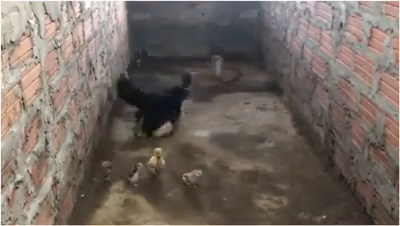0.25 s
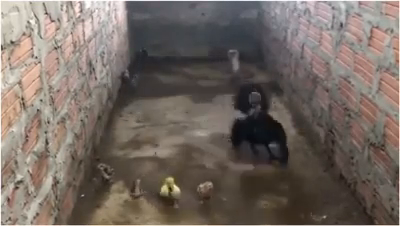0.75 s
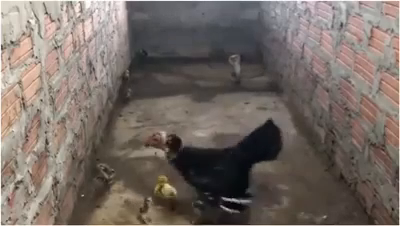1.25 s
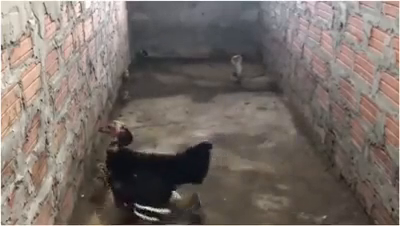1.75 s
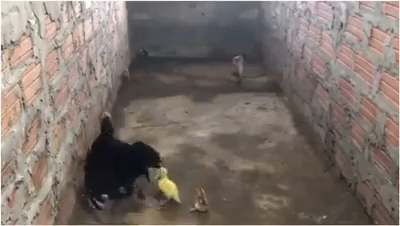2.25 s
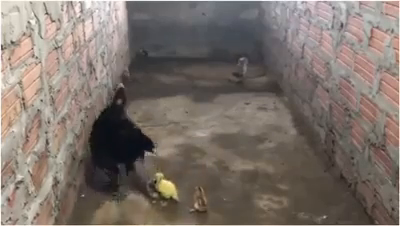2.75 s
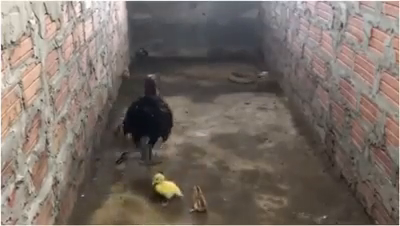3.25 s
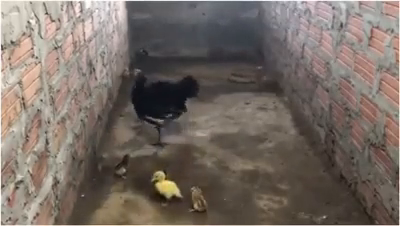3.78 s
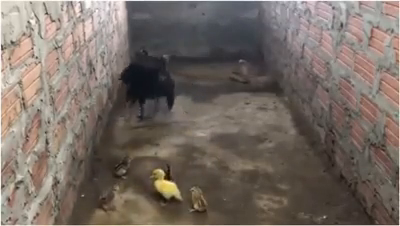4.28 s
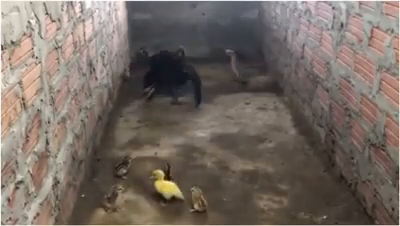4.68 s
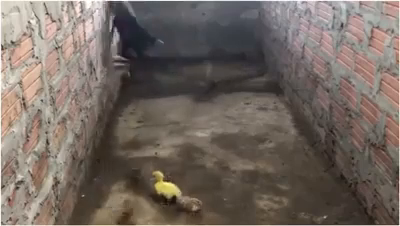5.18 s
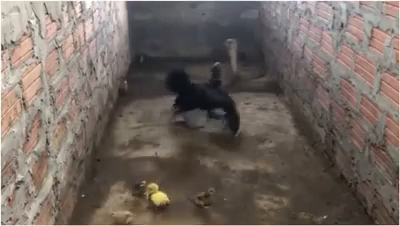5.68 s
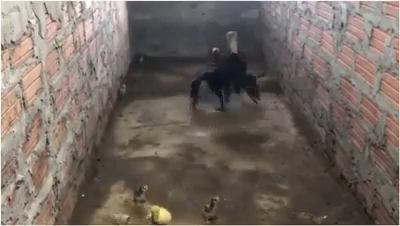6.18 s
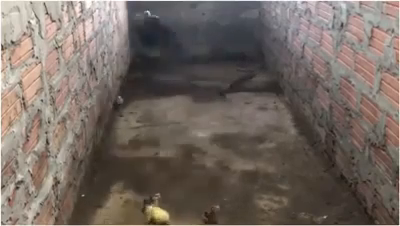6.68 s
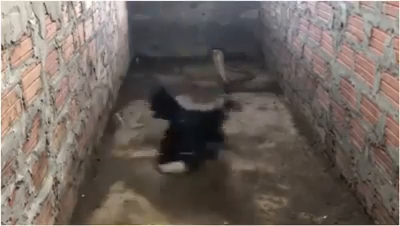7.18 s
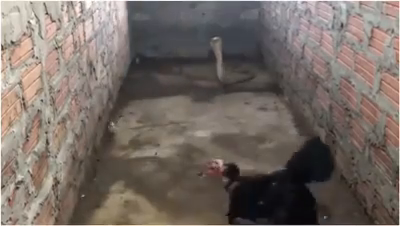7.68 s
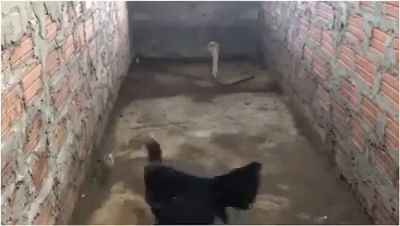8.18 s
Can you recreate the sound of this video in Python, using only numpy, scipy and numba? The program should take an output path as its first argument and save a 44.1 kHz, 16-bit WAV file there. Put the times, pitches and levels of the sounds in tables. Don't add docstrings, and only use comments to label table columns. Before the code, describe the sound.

Chicks whistle falling peeps as a hen gives rough clucks, long squawks and two shrill flapping outbursts between hard echoing walls.

```python
import sys
import numpy as np
from scipy import signal
from scipy.fft import rfft, irfft, next_fast_len
from scipy.io import wavfile
from scipy.ndimage import uniform_filter1d
from numba import njit

SR = 44100
rng = np.random.default_rng(int(sys.argv[2]) if len(sys.argv) > 2 else 0)


def store_pcm(level_fs):
    pcm = np.round(np.clip(level_fs, -1, 1) * 32767).astype(np.int16)
    wavfile.write(sys.argv[1], SR, np.atleast_2d(pcm).T)


def gain_from_db(level_db):
    decades = np.asarray(level_db, float) / 20
    return 10 ** decades


N = 371763


def level(x, db):
    return x * gain_from_db(db) / np.sqrt(np.mean(x ** 2))


def colour(x, points):
    size = next_fast_len(len(x))
    hz, db = np.transpose(points)
    axis_hz = np.fft.rfftfreq(size, 1 / SR) + 1
    gain = gain_from_db(np.interp(np.log(axis_hz), np.log(hz), db))
    return irfft(rfft(x, size) * gain, size)[:len(x)]


@njit
def sweep(x, hz, width):
    y, b, l = np.empty(len(x)), 0., 0.
    for i in range(len(x)):
        g, k = np.tan(np.pi * hz[i] / SR), width / hz[i]
        v = (b + g * (x[i] - l)) / (1 + g * (g + k))
        b, l, y[i] = 2 * v - b, l + 2 * g * v, k * v
    return y


def band(x, hz, width):
    hz = hz + np.zeros(len(x))
    once = sweep(x, hz, 1. * width)
    return sweep(once, hz, 1. * width)


def read(table, span_s, edge_s=.009):
    s, *columns = np.transpose(table)
    t = s[0] + np.arange(int(span_s * SR)) / SR
    edges = np.clip(np.minimum(t - s[0], s[-1] - t) / edge_s, 0, 1)
    return int(s[0] * SR), edges, [np.interp(t, s, c) for c in columns]


def add(out, start, x):
    out[start:start + len(x)] += x[:len(out) - start]


# frequency in Hz, level in dB per Hz.
AIR_COLOUR = [(35, -27), (60, 0), (250, -10.5), (700, -15.5), (2000, -21.5), (5000, -17.5), (10000, -31),
              (15000, -45.5)]
# frequency in Hz, width in Hz, level in dB.
HUM_LINES = [(89, 9.5, -57.5), (130.9, 12, -59.5), (236, 175, -58)]


def background():
    out = level(colour(rng.standard_normal(N), AIR_COLOUR), -53.5)
    out = out + gain_from_db(-55.5) * np.sqrt(2) * np.sin(2 * np.pi * 246.4 * np.arange(N) / SR)
    for hz, width_hz, db in HUM_LINES:
        out = out + level(band(rng.standard_normal(N), hz, width_hz), db)
    knots = np.linspace(0, N, 24)
    drift, sway = (np.interp(np.arange(N), knots, row) for row in rng.uniform(-1.5, 1.5, (2, 24)))
    drone_hz = 44.5 * (1 + .025 * drift)
    drone = np.sin(2 * np.pi * np.cumsum(drone_hz) / SR)
    return out + np.sqrt(2) * gain_from_db(-54.5 + 2.5 * sway) * drone


EFFORT_BRIGHTENS = 0.18


def call(hz, db, low_db, throat_hz, throat_db, treble_db, rough, throat, multiple, share):
    rough = np.clip(rough, 0, 1)
    cycle = (np.cumsum(hz) / SR).astype(int)
    chance = np.clip(rng.standard_normal((400, 2)), -1.7, 1.7)[cycle].T
    phase = 2 * np.pi * np.cumsum(hz * (1 + .22 * rough * chance[0])) / SR
    order = np.arange(1, 27)[:, None]
    steps = np.repeat(rng.standard_normal((26, len(hz) // 900 + 1)), 900, axis=1)
    sway = uniform_filter1d(steps, 900, axis=1)[:, :len(hz)]
    harmonics = gain_from_db(2.5 * sway) * np.cos(order * phase + .06 * order ** 2)
    pulses = harmonics.sum(axis=0) / np.sqrt(13)
    puffs = rng.standard_normal(len(hz)) * (.8 + .5 * np.cos(phase))
    voiced = pulses * gain_from_db(8 * rough * chance[1])
    source = (1 - .5 * rough) * voiced + (.012 + .9 * rough) * puffs
    beak = level(band(source, multiple * hz, share * multiple * hz.mean()), 0)
    windpipe = level(band(source, 630, 890), low_db)
    edge = (1 - rough) * voiced + (.14 + .9 * rough) * puffs
    treble = level(colour(edge, throat), 0) + level(band(source, throat_hz, 490), throat_db)
    treble_gain = gain_from_db(treble_db + EFFORT_BRIGHTENS * (db - db.max()))
    return gain_from_db(db) * (beak + windpipe + treble_gain * treble)


# frequency in Hz, level in dB per Hz.
SHORT_CALL_THROAT = [(1500, -10), (2100, 3.5), (3200, 5.5), (4500, 0.5), (6000, -3), (9000, -6.5),
                     (12000, -23), (15500, -25.5)]


def clucks(rows, mouths, onset_db, end_db, onset_pitch, end_pitch, rough, end_rough,
           windpipe_db, beak_share, throat_db):
    out = np.zeros(N)
    scoop_s, scoop_pitch, scoop_db = .009, .65, -18
    for (s, rise, fall, hz, db), (beak_hz, throat_hz, treble_db) in zip(rows, mouths):
        curve = [(max(s - scoop_s, 0), scoop_pitch * hz, db + onset_db + scoop_db, rough),
                 (s, onset_pitch * hz, db + onset_db, rough),
                 (s + rise, hz, db, rough),
                 (s + rise + fall, end_pitch * hz, db + end_db, end_rough)]
        start, edges, (second_hz, swell_db, harsh) = read(curve, .12)
        voice = call(second_hz / 2, swell_db, windpipe_db, throat_hz * second_hz / hz, throat_db,
                     treble_db, harsh, SHORT_CALL_THROAT, 2 * beak_hz / hz, beak_share)
        add(out, start, edges * voice)
    return out


# start in seconds, rise in seconds, fall in seconds, second harmonic in Hz, peak in dB.
ALARM_TIMES = [(0.0, 0.00075, 0.056, 1180, -17.5), (.065, .03, 0.042, 1165, -8.5),
               (.235, 0.027, 0.038, 1139, -11), (.45, 0.0265, 0.033, 1238, -9.5),
               (4.705, 0.034, 0.044, 1092, -12), (5.405, 0.023, 0.039, 1151, -12),
               (5.665, 0.036, 0.051, 1083, -16), (5.855, .03, .035, 1341, -10),
               (6.252, 0.022, .06, 1186, -12.5), (7.043, 0.012, 0.048, 1291, -10.5),
               (7.443, 0.0068, 0.019, 1139, -21)]
# beak resonance in Hz, throat resonance in Hz, treble in dB.
ALARM_MOUTH = [(1160, 3800, -7.5), (1180, 3600, -4.5), (1167, 3000, -3), (1317.7, 1900, -4.5),
               (1057, 3480, -6.5), (1140, 3100, -3.5), (990, 1930, -4.5), (1366, 860, -6),
               (1240, 3700, -3.5), (1280, 2700, -2.5), (1040, 3900, -6)]


def alarm_clucks():
    return clucks(ALARM_TIMES, ALARM_MOUTH, onset_db=-13, end_db=-9.5, onset_pitch=.92, end_pitch=.86,
                  rough=.35, end_rough=.45, windpipe_db=-15.5, beak_share=.83, throat_db=-7.5)


PEEP_DIVE = [(0, 0), (.3, .07), (.45, .25), (.6, .52), (.85, .71), (1, 1), (1.3, 1.25)]


def chick(peeps, end_hz):
    out, t = np.zeros(N), np.arange(0, .22, 1 / SR)
    hook_share, hook_power = .11, 2.7
    for start, hold, fall, top_hz, db in peeps:
        dive = np.clip((t - hold) / fall, 0, 1.3)
        hook = np.clip(1 - t / hold, 0, 1)
        curve = uniform_filter1d(np.interp(dive, *np.transpose(PEEP_DIVE)), size=300)
        hz = top_hz - (top_hz - end_hz) * curve - hook_share * top_hz * hook ** hook_power
        wobble = uniform_filter1d(rng.standard_normal((2, len(t))), size=60, axis=1) * np.sqrt(60)
        flutter = uniform_filter1d(rng.standard_normal(len(t)), size=400) * 20
        phase = 2 * np.pi * np.cumsum(hz * (1 + .012 * wobble[0])) / SR
        shape_db = np.interp(dive, [0, .25, .6, .95, 1.2], [-1, -1.5, 9, 7.5, -32.5])
        shape_db = shape_db - 8 * hook + 0.47 * wobble[1] + 3 * flutter
        overtones = gain_from_db(-31) * np.sin(2 * phase) + gain_from_db(-44.5) * np.sin(3 * phase)
        tone = np.sin(phase) + gain_from_db(shape_db) * overtones
        fades = np.clip(np.minimum(t, hold + 1.162 * fall - t) * 200, 0, 1)
        add(out, int(start * SR), gain_from_db(db + shape_db) * fades * tone)
    return out


# start in seconds, rise and hold in seconds, fall in seconds, top note in Hz, level in dB.
MIDDLE_CHICK = [(.555, .008, .115, 5500, -38.5), (1.0, .012, .068, 5500, -43),
                (1.456, .04, .078, 5470, -36.5), (1.755, .01, .072, 5565, -35.5),
                (2.09, 0.044, 0.043, 5430, -44), (2.415, .015, 0.041, 4970, -49),
                (2.742, 0.0099, 0.037, 4970, -38), (2.89, .01, 0.024, 5380, -51),
                (2.99, 0.04, 0.03, 5500, -50), (3.108, 0.02, 0.035, 5300, -37),
                (3.905, 0.027, 0.036, 5050, -41), (4.278, 0.042, .03, 5050, -42),
                (4.595, 0.024, 0.034, 5100, -46.5), (5.59, 0.011, 0.038, 5140, -41),
                (6.018, .012, .055, 5580, -38.5), (7.855, .01, 0.027, 5345, -37),
                (7.89, 0.0086, 0.045, 5000, -40.5), (8.09, 0.036, 0.04, 5340, -36),
                (8.146, 0.027, .055, 5700, -38), (8.295, .006, .062, 5210, -34)]
LOW_CHICK = [(.76, .005, .07, 5070, -41.5), (.955, .008, .085, 4940, -38.5),
             (1.06, 0.0093, .08, 4740, -46.5), (1.288, 0.022, 0.051, 5154, -36),
             (1.4, 0.0067, 0.064, 4020, -46.5), (1.65, 0.013, 0.075, 4660, -39.5),
             (1.92, 0.029, 0.065, 4840, -36), (2.14, 0.0067, 0.049, 4070, -52),
             (2.22, 0.02, 0.085, 4870, -36.5), (2.572, 0.034, 0.095, 4730, -38.5),
             (2.955, .03, .092, 4745, -38), (3.283, .025, .1, 4810, -35), (3.85, 0.022, 0.061, 4700, -36.5),
             (4.002, 0.0061, 0.065, 3860, -54.5), (4.5, 0.018, 0.071, 4540, -49.5),
             (5.765, 0.011, .075, 4680, -34.5), (6.12, .008, 0.064, 4690, -37.5),
             (6.35, 0.0033, 0.051, 5080, -36), (6.414, .025, 0.066, 4740, -39.5),
             (7.1, 0.007, 0.041, 4440, -39), (7.235, .008, 0.059, 5050, -36),
             (7.375, .065, 0.083, 4720, -36.5), (7.5, 0.012, .08, 4400, -50),
             (8.012, .006, 0.085, 3980, -37.5), (8.07, 0.0062, .065, 4300, -41),
             (8.21, 0.0086, .1, 4100, -46), (3.42, .036, 0.039, 5830, -40)]
HIGH_CHICK = [(.805, 0.01, .085, 5830, -33), (1.148, 0.015, .095, 5795, -39.5),
              (1.47, 0.028, 0.13, 6200, -46), (1.79, 0.029, 0.093, 5807, -39.5),
              (2.12, 0.029, .105, 5800, -38.5), (2.418, 0.023, 0.093, 5820, -37),
              (2.73, 0.023, 0.095, 5950, -38), (3.08, 0.024, 0.092, 5990, -39), (3.745, .01, .1, 6080, -34),
              (4.032, 0.029, .115, 5785, -33), (4.36, 0.041, .105, 6090, -29.5),
              (4.69, 0.066, 0.087, 6380, -32), (5.32, .015, .065, 5620, -35.5),
              (5.783, 0.042, .06, 5610, -30), (6.135, 0.011, .085, 5670, -36.5),
              (6.405, 0.02, .085, 5860, -35.5), (7.99, 0.028, 0.11, 5540, -37.5),
              (8.353, 0.039, 0.088, 5550, -34)]
# delay in seconds, level in dB.
NEAR_ECHOES = [(.007, -12), (.016, -12), (.029, -13)]


def chicks():
    peeps = chick(MIDDLE_CHICK, end_hz=2810) + chick(LOW_CHICK, end_hz=2380) + chick(HIGH_CHICK, end_hz=2800)
    return peeps, sum(gain_from_db(db) * np.roll(peeps, int(s * SR)) for s, db in NEAR_ECHOES)


# start in seconds, rise in seconds, fall in seconds, second harmonic in Hz, peak in dB.
CLEAR_TIMES = [
    (.685, .045, .03, 1040, -15),
    (6.495, 0.053, 0.027, 1241, -12),
    (7.37, 0.029, 0.045, 967, -17.5),
    (7.588, 0.023, 0.042, 905, -17),
]
# beak resonance in Hz, throat resonance in Hz, treble in dB.
CLEAR_MOUTH = [(1115, 2900, -6), (1500, 2450, -2), (1040, 3200, -4.5), (1250, 4300, -5.5)]


def clear_clucks():
    return clucks(CLEAR_TIMES, CLEAR_MOUTH, onset_db=-12, end_db=-14.5, onset_pitch=.86, end_pitch=.95,
                  rough=.22, end_rough=.55, windpipe_db=-11, beak_share=.88, throat_db=-11)


# start in seconds, rise in seconds, fall in seconds, second harmonic in Hz, peak in dB.
SOFT_TIMES = [
    (1.295, 0.0085, 0.04, 800, -46.5),
    (1.338, 0.0086, 0.042, 960, -31),
    (1.96, 0.0052, 0.011, 855, -60),
    (1.987, 0.0089, 0.046, 981, -26),
    (2.66, .008, 0.032, 960, -28.5),
    (3.38, 0.028, 0.012, 987, -35),
]
# beak resonance in Hz, throat resonance in Hz, treble in dB.
SOFT_MOUTH = [(690, 4500, -14), (770, 4550, -3.5), (750, 4500, -17), (870, 4300, -10), (800, 4500, -14.5),
              (900, 4500, -12)]


def soft_clucks():
    return clucks(SOFT_TIMES, SOFT_MOUTH, onset_db=-20, end_db=-15.5, onset_pitch=.95, end_pitch=.88,
                  rough=.55, end_rough=.7, windpipe_db=-2, beak_share=1.1, throat_db=1.5)


# start in seconds, rise in seconds, fall in seconds, peak in dB.
RUSTLE_TIMES = [
    (1.78, 0.077, 0.036, -38),
    (4.94, .05, .05, -35),
    (5.05, 0.043, .06, -28.5),
    (5.17, 0.044, 0.074, -39.5),
    (6.56, 0.044, 0.033, -31),
    (6.68, 0.022, 0.051, -30),
    (6.8, 0.0296, 0.057, -31.5),
    (6.995, 0.0073, 0.055, -36.5),
    (7.31, 0.0255, 0.0605, -36),
]


def rustles():
    out = np.zeros(N)
    depth_db = -21
    for s, rise, fall, db in RUSTLE_TIMES:
        brush = [(s, db + depth_db), (s + rise, db), (s + rise + fall, db + depth_db)]
        start, edges, (brush_db,) = read(brush, .2, .01)
        noise = rng.standard_normal(len(edges))
        hiss = colour(noise, [(1000, 2.0), (3000, 10.5), (9000, 3.5), (15000, -15.5)])
        add(out, start, edges * gain_from_db(brush_db) * level(hiss, 2.8))
    return out


# start in seconds, length in seconds, pitch in Hz, level in dB.
DISTANT_NOTES = [
    (2.808, .13, 1910, -55),
    (3.172, .21, 1000, -55.5),
    (3.2, .06, 1558, -59),
]


def far_hen():
    out = np.zeros(N)
    for start, length, hz, db in DISTANT_NOTES:
        t = np.arange(0, length, 1 / SR)
        swell = np.sin(np.pi * t / length)
        add(out, int(start * SR), gain_from_db(db) * swell * np.sin(2 * np.pi * hz * t))
    return out


# time in seconds, pitch in Hz, level in dB, treble in dB, roughness 0-1.
LONG_SQUAWKS = [
    [(3.452, 587, -9.5, 0, 0.01), (3.46, 559.2, -11.5, -8, 0.1), (3.492, 564.3, -9.5, -4.5, 0.03),
     (3.528, 534, -23.5, 4, 0.06), (3.552, 536, -17, -0.5, 0), (3.62, 572.3, -11.5, -6.5, 0.02),
     (3.694, 586.2, -9, -7, 0.03), (3.705, 603, -22.5, -6.5, 0.1)],
    [(7.67, 511, -13, 3, 0.02), (7.674, 507.6, -10.5, -3, 0.02), (7.69, 561, -9, -4, 0.1),
     (7.714, 560.2, -12.5, 4.5, 0.04), (7.746, 568, -11, -2, 0.01), (7.762, 594.3, -9.5, -0.5, 0.03),
     (7.786, 590, -15.5, 3, 0.1), (7.798, 551, -11, -5, 0.04), (7.812, 563, -17, -7, 0)],
]
# start in seconds, length in seconds, level in dB.
VOICE_BREAKS = [
    (3.704, .05, -15),
    (7.803, .05, -19),
]
LONG_CALL_THROAT_HZ = [2040, 3300, 2930, 3500]
# frequency in Hz, level in dB per Hz.
LONG_CALL_THROAT = [(1400, -18.5), (2200, 4), (2900, -9), (3400, -4), (5200, -10), (9000, -15),
                    (12000, -33.5), (15500, -35)]


def squawks():
    out = np.zeros(N)
    break_hz, sag, fade_db = 573.4, .78, -8
    treble, dulls_db, roughness = 2, -19, .85
    breaks = [[(s, break_hz, db, treble, roughness),
               (s + length, sag * break_hz, db + fade_db, treble + dulls_db, roughness)]
              for s, length, db in VOICE_BREAKS]
    for table, throat_hz in zip(list(LONG_SQUAWKS) + breaks, LONG_CALL_THROAT_HZ):
        start, edges, (hz, db, treble_db, rough) = read(table, .28)
        voice = call(hz, db, -16.5, throat_hz, -7.0, treble_db, rough, LONG_CALL_THROAT,
                     multiple=2.23, share=.61)
        add(out, start, edges * voice)
    return out


# start in seconds, rise in seconds, fall in seconds, second harmonic in Hz, peak in dB.
MUTTER_TIMES = [
    (4.293, 0.036, 0.022, 830, -24.5),
    (4.52, 0.03, 0.023, 855, -18.5),
    (6.07, 0.039, 0.037, 962, -14),
    (8.365, 0.029, 0.067, 830, -27),
]
# beak resonance in Hz, throat resonance in Hz, treble in dB.
MUTTER_MOUTH = [(746, 1680, -15.5), (850, 4500, -17), (960, 3340, -9.5), (728, 5100, -16)]


def mutters():
    return clucks(MUTTER_TIMES, MUTTER_MOUTH, onset_db=-10.5, end_db=-5.5, onset_pitch=.88, end_pitch=1.0,
                  rough=.38, end_rough=.35, windpipe_db=-23, beak_share=.54, throat_db=-3)


# start in seconds, rise in seconds, fall in seconds, second harmonic in Hz, peak in dB.
CACKLE_TIMES = [
    (4.875, .036, .03, 1250, -7.5),
    (4.995, .028, 0.0453, 1466, -5.5),
    (5.108, .014, 0.054, 1476, -6),
    (5.243, 0.011, .038, 1280, -6),
    (6.6, .047, 0.055, 1307, -6),
    (6.73, .03, .012, 1500, -3),
    (6.778, .02, 0.019, 1176, -8),
    (6.855, .024, .035, 1322, -8),
]
# beak resonance in Hz, throat resonance in Hz, treble in dB.
CACKLE_MOUTH = [(1420, 3940, -7), (1540, 3900, -7), (1500, 3720, -8.5), (1350, 4030, -7),
                (1760, 2900, -6.5), (1500, 4400, -7.5), (1250, 4400, -9), (1376, 3680, -5)]


def flight_cackles():
    return clucks(CACKLE_TIMES, CACKLE_MOUTH, onset_db=-9.5, end_db=-9, onset_pitch=.93, end_pitch=.74,
                  rough=.36, end_rough=.5, windpipe_db=-23, beak_share=.54, throat_db=-9.5)


# peak time in seconds, level in dB.
BEAT_TIMES = [
    (4.961, -40),
    (5.08, -32),
    (5.125, -36),
    (5.208, -36.5),
    (6.596, -37),
    (6.652, -36),
    (6.8, -34),
    (6.891, -38),
]


def wing_beats():
    out = np.zeros(N)
    rise_s, fall_s, depth_db = .079, .13, -26.5
    for s, db in BEAT_TIMES:
        beat = [(s - rise_s, db + depth_db), (s, db), (s + fall_s, db + depth_db)]
        start, edges, (push_db,) = read(beat, .16, .02)
        air = rng.standard_normal((2, len(edges)))
        thump = level(band(band(air[0], 92, 83), 80, 53), 0)
        rush = level(band(air[1], 140, 158.6), -4.5)
        add(out, start, edges * gain_from_db(push_db) * (thump + rush))
    return out


# frequency in Hz, decay by 60 dB in seconds, level in dB.
WALL_RING = [(266, 0.2, -13), (625, 0.39, -17), (830, 0.54, -25), (1250, 0.38, -19.5), (2610, 0.61, -25),
             (3580, 0.34, -20.5), (5500, 0.74, -26), (9740, 0.25, -12.5)]
STANDING_WAVES = [(555, .3, -33), (905, .4, -28)]
# delay in seconds, level in dB.
FIRST_ECHOES = [(.0031, -17.5), (.0074, -19), (0.0114, -16), (0.023, -27.5), (0.036, -21.5), (0.058, -28.5)]


def corridor(x):
    t = np.arange(SR) / SR
    tail = 0
    for hz, t60, db in WALL_RING:
        noise = level(band(rng.standard_normal(SR), hz, .8 * hz), db)
        tail = tail + noise * gain_from_db(-60 * t / t60) / np.sqrt(t60 * SR / 14)
    for hz, t60, db in STANDING_WAVES:
        tail = tail + gain_from_db(db - 60 * t / t60) * np.sin(2 * np.pi * hz * t) / np.sqrt(t60 * SR / 28)
    tail = tail * np.clip(t / 0.0004 - 1, 0, 1)
    for s, db in FIRST_ECHOES:
        tail[int(s * SR)] += gain_from_db(db)
    return x + signal.fftconvolve(x, tail)[:N]


def scene():
    peeps, doubles = chicks()
    hen = alarm_clucks() + clear_clucks() + soft_clucks() + squawks() + mutters() + flight_cackles()
    feathers = rustles() + wing_beats()
    birds = corridor(hen + far_hen() + peeps + doubles + feathers)
    return (birds - .5 * peeps + background())[None]


def band_limit(x):
    return signal.sosfilt(signal.butter(12, 15640, fs=SR, output="sos"), x)


# frequency in Hz, gain in dB.
MICROPHONE = [(25, -18.5), (42, -1), (1500, -1), (2000, -8), (2500, 0.5), (9200, -3), (9700, -4),
              (11500, 8.5)]


def record(dry):
    heard = colour(dry[0], MICROPHONE)[None]
    ceiling = .97
    mix = heard / (1 + (heard / ceiling) ** 8) ** (1 / 8)
    return band_limit(mix)


dry = scene()
out = record(dry)
store_pcm(out)
```